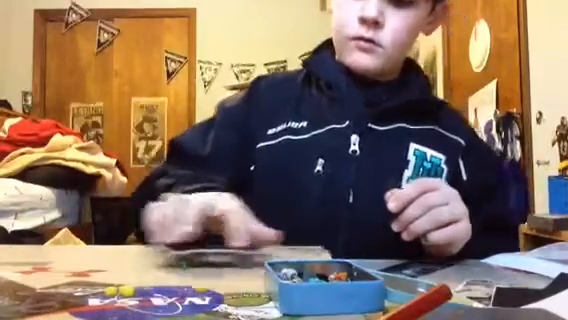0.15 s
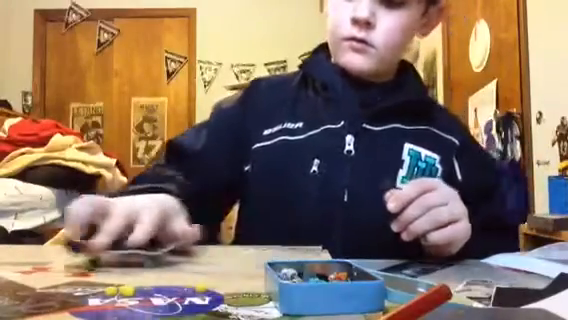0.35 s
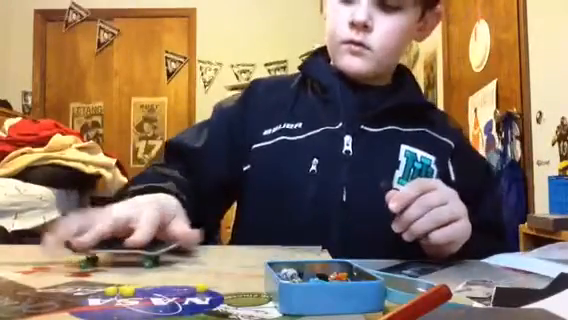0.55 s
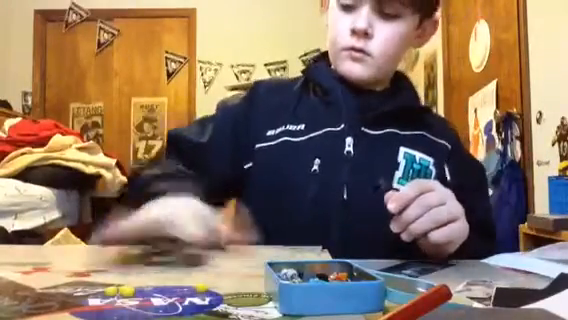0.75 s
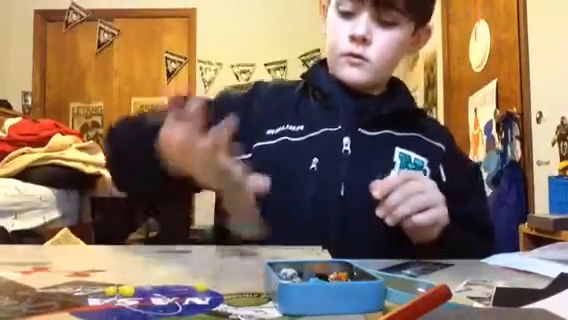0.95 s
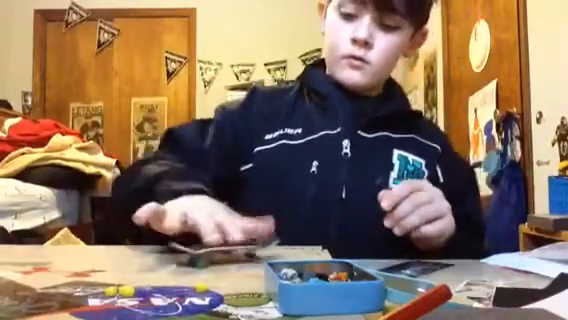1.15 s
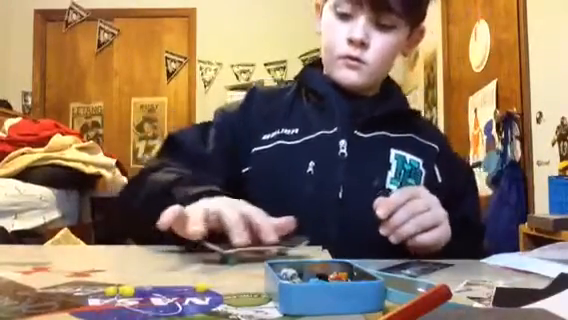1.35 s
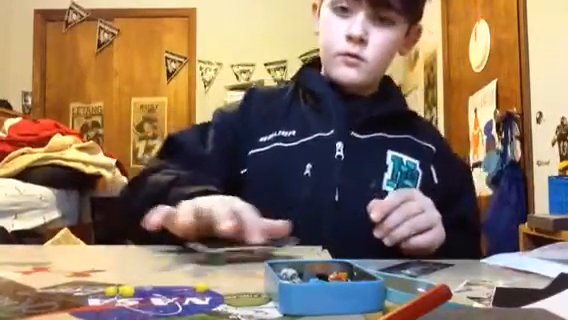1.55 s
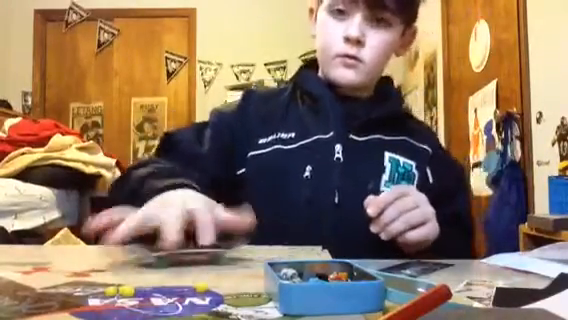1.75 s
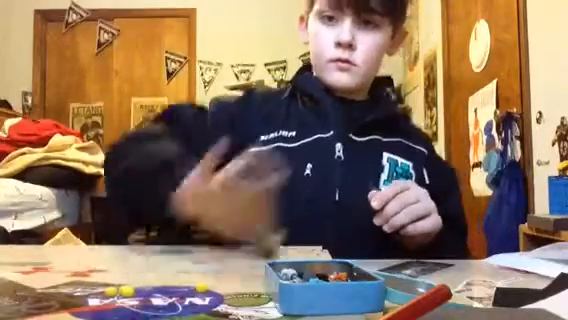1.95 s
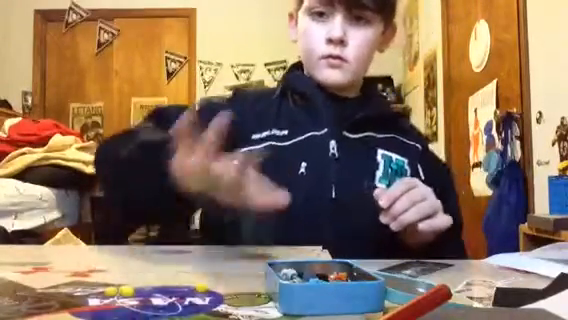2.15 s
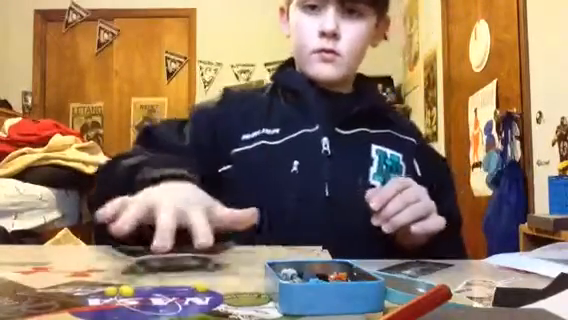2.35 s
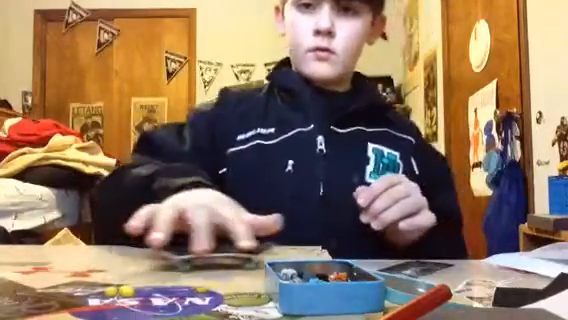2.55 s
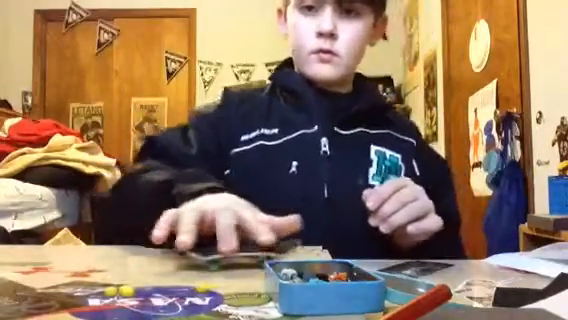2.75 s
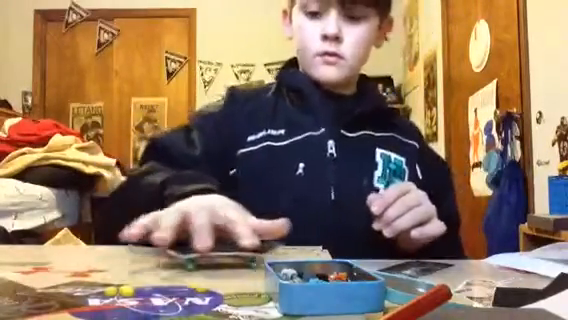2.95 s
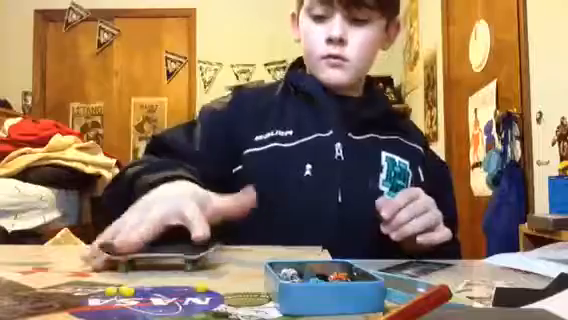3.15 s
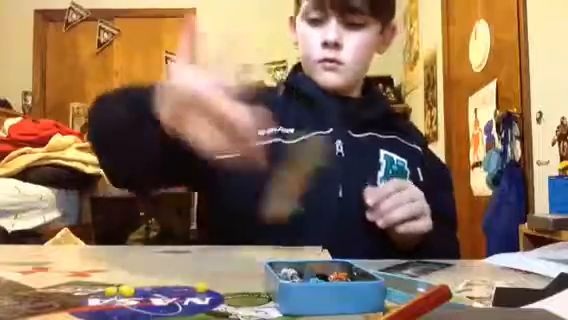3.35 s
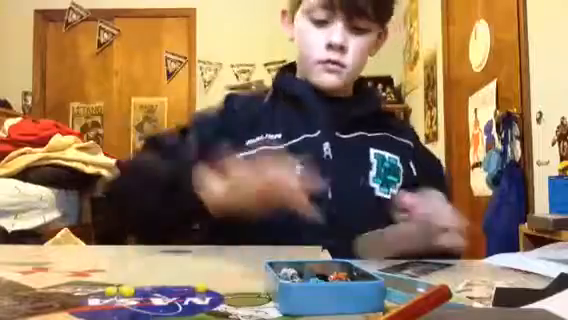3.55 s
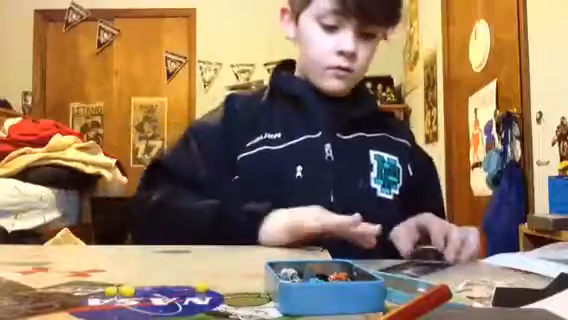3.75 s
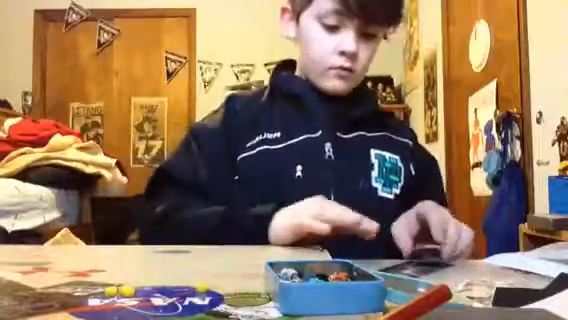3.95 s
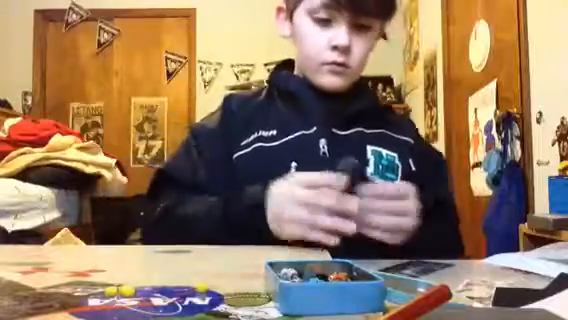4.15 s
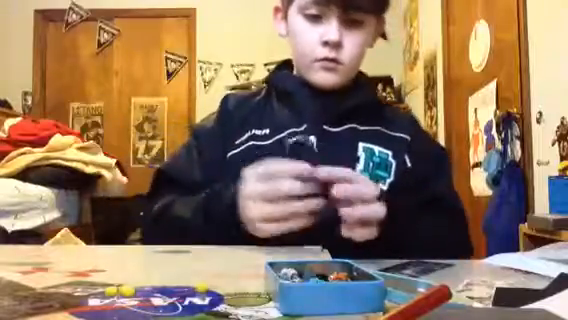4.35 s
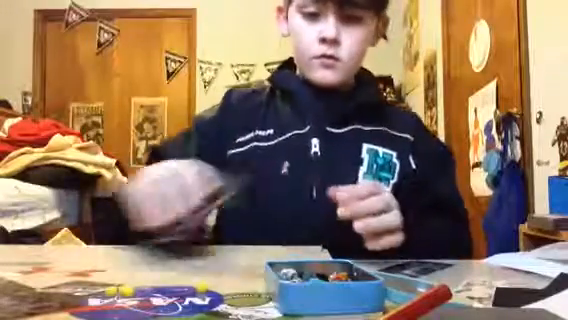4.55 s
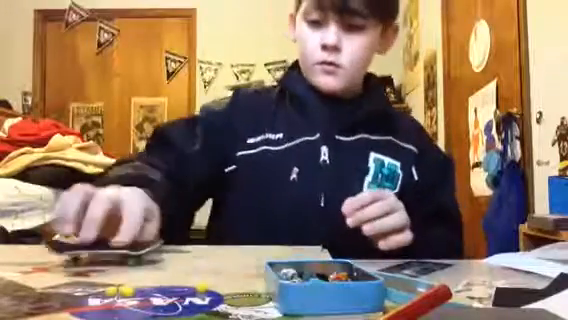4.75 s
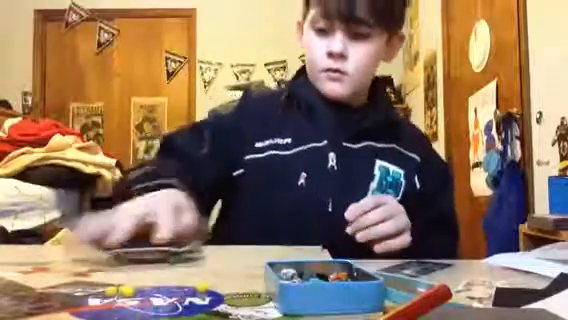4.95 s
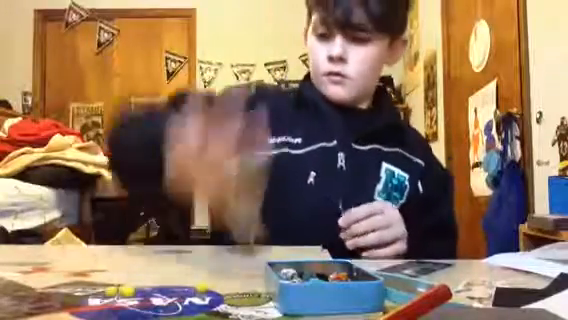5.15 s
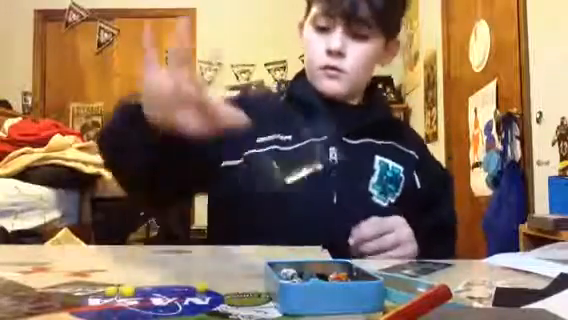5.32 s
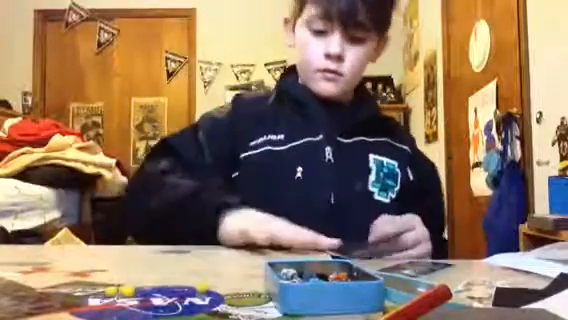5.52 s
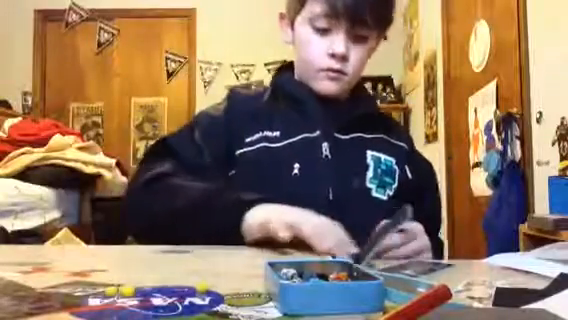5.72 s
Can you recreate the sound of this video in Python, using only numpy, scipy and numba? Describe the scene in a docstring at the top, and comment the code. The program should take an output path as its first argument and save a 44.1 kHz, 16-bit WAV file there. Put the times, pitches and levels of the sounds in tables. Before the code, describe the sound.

Close, dry wheel rumble and scraping on a table, broken by bright snaps and hard clacking landings of a toy skateboard indoors.

```python
"""In a small bedroom, close to the microphone, a fingerboard is ridden on a tabletop.
Its wheels roll over random bumps, which filters and moving resonances turn into rumble, grit and hiss.
The tail pops, and deck and trucks clatter down in quick bounces: noise bursts, damped modes and low thuds.
Skids growl, loose trucks rattle, and the board rustles as it is picked up and turned in the fingers.
Diffuse echoes and faint background noise surround it; the loudest clacks overload the recorder."""
import sys
import numpy as np
from scipy import signal
from scipy.fft import rfft, irfft
from scipy.io import wavfile
from numba import njit

SR = 44100
rng = np.random.default_rng(int(sys.argv[2]) if len(sys.argv) > 2 else 0)


def waveform_to_disk(signal):
    """Save audio, clipped to [-1, 1], as 16-bit WAV at the path in sys.argv[1]."""
    frames = np.transpose(np.atleast_2d(signal))
    scaled = np.clip(frames, -1, 1) * 32767
    samples = np.round(scaled).astype(np.int16)
    wavfile.write(sys.argv[1], SR, samples)


N = 254892
TIME = np.arange(N) / SR
HIT_TIME = np.arange(SR // 4) / SR

# strokes of the hand that roll the board; pressure is grit over rumble, both before their overall trims:
# start_s, rise_s, hold_s, release_s, rumble_db, pressure_db
STROKES = [(0,.01,.14,0.037,-52.5,-0.5), (0.124,0.066,0.18,.19,-31.5,0.5),
           (.575,0.23,.045,0.096,-33.5,-3.5), (1.098,0.0063,0.044,.09,-30.5,-20.5),
           (1.161,.04,0.11,0.093,-43.5,-7), (1.346,.03,0.037,.115,-48.5,6), (1.574,0.043,0.2,0.079,-37.5,0),
           (1.922,0.021,0.06,0.053,-41.5,7), (2.281,0.018,.02,0.095,-28,-19),
           (2.40,.11,.18,0.12,-41.5,-8.5), (2.885,0.26,.065,0.04,-34.5,-3.5),
           (3.272,.02,0.033,0.09,-41.5,8), (4.70,.02,.11,0.038,-40,7), (4.80,.05,.085,0.035,-39,-7.5),
           (4.92,0.03,0.082,0.089,-35.5,-2), (4.974,0.16,0.041,0.029,-32,1)]
# spectra of wheel rumble, grit and hiss: frequency_hz, level_db
RUMBLE_SPECTRUM = [(60, -46.5), (130, -50.5), (300, -20), (500, -25.5), (680, -3), (880, -1), (1130, 4.5),
                   (1400, -1), (1900, -14), (3000, -19), (6000, -56.5), (15000, -66)]
GRIT_SPECTRUM = [(300, -49), (900, -10.5), (1400, 8), (1800, 9), (2150, 3), (2550, 8), (3200, 4),
                 (4500, -1.5), (5300, -14), (6000, -29), (15000, -66)]
HISS_SPECTRUM = [(2500, -31), (5000, 3.5), (6200, -3.5), (7800, 3.5), (10000, -10.5), (12000, -9),
                 (13500, -29.5), (15000, -16.5)]

# deck and trucks hit the table under the fingers; knock and crack are relative to the contact:
# start_s, level_db, pitch_hz, knock_db, crack_db
CLACKS = [(0.0421,-36.5,1730,-16.5,-25.5), (0.2075,-27,2300,-21,-13.5), (0.8037,-22,1640,-28,-12.5),
          (1.0703,-16,4500,-28,-6), (1.0983,-10,1390,-14,-3), (1.1321,-13.5,2820,-25,-8.5),
          (1.1487,-13,1430,-17,-4.5), (1.9368,-29,1563,-34,-11.5), (2.2545,-11,2620,-29,-9),
          (2.257,-16.5,2240,-19,-4.5), (2.284,-10,2730,-17,-4), (2.2926,-11.5,1393,-25,-6),
          (3.2702,-18,3730,-18.5,-8), (3.5692,-25,3800,-30,-2), (3.586,-30,3670,-33,1),
          (3.6209,-28,3600,-12.5,-3.5), (3.6412,-30.5,2710,-10,-15), (3.7451,-30.5,1800,-10.5,5),
          (4.215,-55.5,1180,-1.5,-20), (4.7129,-31,2010,-34,-8), (4.726,-25.5,2180,-43,-21),
          (4.7653,-25.5,2170,-46,-5.5), (4.833,-31,1390,-36,-7), (5.4804,-11,4450,-14.5,-6.5),
          (5.4968,-13.5,1326,-10.5,-21), (5.517,-23,2800,-4.5,3.5), (5.56,-10,2280,-28,-12.5),
          (5.5722,-18,2600,-19,-10), (5.5792,-11,3640,-19,-8.5), (5.7092,-33.5,2420,-12,-1),
          (5.77,-32,4860,-13,-7.5)]
# light ticks of the wheels and trucks: start_s, level_db, pitch_hz
TICKS = [(.305,-27.5,2690), (.36,-32.5,2500), (.592,-50.5,1120), (0.964,-51,2700), (1.3695,-41.5,2720),
         (1.793,-40.5,2400), (2.382,-35,888), (2.848,-49,1950), (2.925,-51,2610), (4.004,-55.5,2380),
         (4.245,-59,4280), (4.451,-52,2780)]
# free falls of the loose board after a missed catch, with brief contact: start_s, level_db, pitch_hz
DROPS = [(3.545, -11.5, 2023), (3.6893, -11, 2400)]
DROP_T60_S, DROP_KNOCK_DB, DROP_CRACK_DB, DROP_THUMP_DB = 0.016, -26.5, -15.5, -32.5
# nominal chatter decay at the reference pitch; lower parts chatter longer
CONTACT_T60_S, CONTACT_REF_HZ, CONTACT_SLOPE = .026, 2620, 0.41
# modes of the board on the tabletop, before each blow's weighting, detuning and decay scale:
# frequency_hz, level_db, t60_s
BOARD_MODES = [(647, -2, 0.074), (1000, -9, 0.086), (1142, -1, 0.06), (1395, -6, 0.093), (1776, -2, 0.045),
               (2562, 2.5, 0.035), (2800, 3.5, 0.025), (3180, -7, 0.019), (4240, -3.5, 0.081),
               (4260, -13, 0.0088), (4870, -3.5, 0.02), (5073, -4, 0.059), (7540, -19, 0.0062)]
# spectra of contact chatter, table knock, hard crack and low table thud: frequency_hz, level_db
CHATTER_SPECTRUM = [(200, -36), (700, -25.5), (1100, 0.5), (1400, 9.5), (2100, 0), (2700, 8), (4600, 2),
                    (6000, -12), (10000, -17), (15000, -27)]
KNOCK_SPECTRUM = [(25, -34), (70, -34), (150, -6), (260, -8), (370, 6.5), (500, 1.5), (700, 2.5), (950, 9),
                  (1500, -12), (4000, -51)]
CRACK_SPECTRUM = [(1500, -25), (3500, -4), (5000, -1.5), (6200, -3.5), (7700, -2.5), (9500, -12.5),
                  (12000, -13), (15000, -25)]
THUD_SPECTRUM = [(40, -50), (85, -29.5), (115, -3.5), (140, -4.5), (200, 0), (280, -2), (370, 0),
                 (480, -8.5), (1200, -31)]

# sideways skids of a wheel, with the pitch at their start: start_s, rise_s, hold_s, release_s, level_db, pitch_hz
SKIDS = [(0.713,0.017,0.025,.03,-38,1020), (4.938,0.036,.015,0.05,-29,1237)]
SKID_FALL_OCTAVES_PER_S, SKID_WIDTH_HZ = 4.3, 220

# snaps of the tail against the table, the thump before its overall trim: start_s, deck_db, snap_db, thump_db
POPS = [(.843, -22.5, -22, -37), (1.982, -22, -16.5, -44.5), (3.3196, -21.5, -20, -36.5),
        (5.1855, -20, -15.5, -43)]
# spectrum of the tail tip's snap: frequency_hz, level_db
SNAP_SPECTRUM = [(500, -21), (1500, -6.5), (2500, -4.5), (4200, 1.5), (6000, -3), (7500, 2.5), (9200, -6.5),
                 (12000, -13.5), (15000, -18.5)]
POP_DECK_HZ, POP_SNAP_T60_S, POP_LEAD_S = 1510, .012, .001

# fingers and sleeve rub on the board, before the overall trim: start_s, rise_s, hold_s, release_s, level_db
RUBS = [(3.826,.03,0.026,0.086,-65), (3.39,0.032,0.11,.03,-56), (4.194,0.043,0.32,0.048,-61),
        (4.596,0.014,0.09,0.027,-45.5)]
# spectrum of the rustle: frequency_hz, level_db
RUB_SPECTRUM = [(59, -46), (100, -43), (227, -10.5), (399, -15.5), (582, -0.5), (1590, 8.5), (2320, -4),
                (4640, 1), (6760, -19.5), (8880, -13.5), (15000, -37)]
# rattles of loose trucks after a missed landing: start_s, hold_s, level_db
RATTLES = [(3.553,0.09,-45), (3.696,0.09,-41), (5.58,0.018,-37)]

# bands of the room's echoes: frequency_hz, echo_db, t60_s
ROOM_BANDS = [(150, -3, 0.32), (406, -6.5, 0.16), (1020, -13, 0.32), (2200, -15, 0.29), (4500, -12.5, 0.32),
              (8700, -9, 0.2), (13750, -6.5, 0.2)]
# spectrum of the faint background noise: frequency_hz, level_db
AIR_SPECTRUM = [(50, -44), (150, -7.5), (600, -6), (1200, -3), (2200, -10.5), (2680, 1.5), (3200, -10),
                (5200, -15.5), (6200, -22), (15000, -24.5)]
AIR_DB = -65.5  # level about which the noise wanders
TOP_HZ = 15400  # upper limit of the recorder


def undb(db):
    """Logarithmic level: decibels become an amplitude gain."""
    return 10 ** (np.asarray(db) / 20)


def unit(x):
    """Mean power: scale to rms 1."""
    return x / np.sqrt(np.mean(x ** 2))


def unit_attack(x):
    """Attack power: scale to rms 1 over the first 5 ms."""
    return x / np.sqrt(np.mean(x[:SR // 200] ** 2))


def colour(x, points):
    """Minimum-phase filtering: a folded cepstrum makes a causal filter through (Hz, dB) points."""
    size = 4096
    hz, db = np.transpose(points)
    grid = np.maximum(np.fft.rfftfreq(size, 1 / SR), 1)
    log_gain = np.log(undb(np.interp(np.log(grid), np.log(hz), db)))
    cepstrum = irfft(log_gain)
    cepstrum[1:size // 2] *= 2
    cepstrum[size // 2 + 1:] = 0
    impulse = irfft(np.exp(rfft(cepstrum)))[:size // 2]
    return signal.fftconvolve(x, impulse)[:len(x)]


@njit
def resonate(x, hz, width):
    """Time-varying resonance: a band-pass of given width in Hz whose centre may move every sample."""
    y, band, low = np.empty(len(x)), 0., 0.
    for i in range(len(x)):
        g, k = np.tan(np.pi * hz[i] / SR), width / hz[i]
        v = (band + g * (x[i] - low)) / (1 + g * (g + k))
        band, low, y[i] = 2 * v - band, low + 2 * g * v, k * v
    return y


def fade(t, t60):
    """Exponential damping: 60 dB down after t60."""
    return np.exp(-np.log(1000) * t / max(t60, 1 / SR))


def add(track, start, sound):
    """Superposition: mix a sound into the track at a time."""
    i = int(np.clip(start * SR, 0, N - 1))
    track[i:i + len(sound)] += sound[:N - i]


def walk(rate):
    """Random modulation: a bounded wander through `rate` points per second, with a spread near 1."""
    steps = 2 * np.tanh(rng.standard_normal(4096))
    return np.interp(TIME * rate, np.arange(len(steps)), steps)


def grains(rate, spread_db):
    """Shot noise: random tiny impacts of unequal size, `rate` per second on average."""
    size = undb(spread_db * np.minimum(rng.exponential(size=N), 3))
    return (rng.random(N) < rate / SR) * rng.choice([-1, 1], N) * size


def gesture(start, rise, hold, release):
    """Trapezoidal envelope: a movement of the hand, 0-1, builds evenly, holds and lets go."""
    opening = (TIME - start) / rise
    closing = (start + rise + hold + release - TIME) / release
    return np.clip(np.minimum(opening, closing), 0, 1)


def rolling(speed_power=1.024, grit_power=1.77):
    """Power laws of rolling: rumble and grit, in dB, both grow with speed, the grit faster."""
    rumble = grit = np.full(N, undb(-110))  # floor keeps the logarithm finite
    for start, rise, hold, release, db, pressure_db in STROKES:
        speed = gesture(start, rise, hold, release)
        rumble = np.hypot(rumble, undb(db) * speed ** speed_power)
        grit = np.hypot(grit, undb(db + pressure_db) * speed ** grit_power)
    return 20 * np.log10(rumble), 20 * np.log10(grit)


def wheels(rumble_db=-3, grit_db=-2, hiss_db=-16.0, hiss_growth=0.31, sing_db=0, scrape_db=-6,
           low_grit_db=-1, high_grit_db=-6, note_hz=1200, note_octaves_per_db=0.36):
    """Roughness excitation: clumps of tiny bumps ring board and table; wheels pressed hard grind and hiss."""
    def bumps():
        """Clustered shot noise: the tiny impacts vary in strength along the grain."""
        return grains(rate=2000, spread_db=3) * undb(1.8 * walk(70))

    judder = undb(2.5 * walk(90))
    level, rough = rolling()

    # the resonances shift as the wheels travel; firmer fingers raise the tabletop's main note
    note = note_hz * 2 ** (note_octaves_per_db * (rough - level))
    sing = unit(resonate(bumps(), note * np.exp(0.055 * walk(25)), 53.0))
    scrape = unit(resonate(bumps(), 1700 * np.exp(0.21 * walk(22)), 61.0))
    rumble = unit(unit(colour(bumps(), RUMBLE_SPECTRUM)) + undb(sing_db) * sing)

    # front and rear wheels meet different bumps
    front, rear = bumps() * judder, bumps() * judder
    squeeze_hz = 3100 * np.exp(0.35 * walk(30))
    squeeze = unit(resonate(colour(rear, GRIT_SPECTRUM), squeeze_hz, 320.0))
    grit = undb(low_grit_db) * unit(colour(front, GRIT_SPECTRUM))
    grit += undb(high_grit_db) * squeeze
    grit += undb(scrape_db) * scrape * judder
    grit = unit(grit)

    # hiss gains on the grit as the grit nears its peak level
    pressure_db = rough - rough.max()
    hiss = undb(hiss_db + hiss_growth * pressure_db) * unit(colour(front + rear, HISS_SPECTRUM))
    return undb(level + rumble_db) * rumble + undb(rough + grit_db) * (grit + hiss)


def burst(t60, press_share=0.15):
    """Broadband impact: micro-contacts with a nearly even spectrum hold under pressure, then fade."""
    press_s = press_share * t60
    envelope = fade(np.hypot(HIT_TIME, press_s) - press_s, t60)
    x = rng.standard_normal(len(envelope)) * envelope
    # keeping only the phases evens the spectrum
    even = irfft(np.exp(1j * np.angle(rfft(x))), len(x))
    return even * np.sqrt(envelope)


def ring(modes, scatter=0.036):
    """Modal superposition: damped sines, detuned a little at each blow by the grip of the fingers."""
    out = np.zeros(len(HIT_TIME))
    for (hz, db, t60), (u, phase) in zip(modes, rng.random((len(modes), 2))):
        detuned_hz = hz * (1 + scatter * (2 * u - 1))
        out += undb(db) * fade(HIT_TIME, t60) * np.sin(2 * np.pi * (detuned_hz * HIT_TIME + phase))
    return out


def contact(centre_hz, t60, focus_db=2.5, ring_db=-4.5, ring_scale=.75, part_db=-3.0, part_cycles=19):
    """Impact response: brief chatter, board modes around the striking part's pitch, and the part's own ring."""
    def stress(hz):
        """Spectral focus: the level falls with distance in octaves from the struck pitch."""
        octaves = np.log2(hz / centre_hz)
        return -focus_db * octaves ** 2 / np.hypot(1, octaves)

    chatter_points = [(hz, db + stress(hz)) for hz, db in CHATTER_SPECTRUM]
    chatter = colour(burst(t60, press_share=0.13), chatter_points)
    swell = 1 - fade(HIT_TIME, 0.015)
    struck = [(hz, db + 2 * stress(hz), ring_scale * decay) for hz, db, decay in BOARD_MODES]
    modes = swell * ring(struck, scatter=0.025)
    # the part dies within a set number of cycles, so high ones are short and broad
    part = swell * ring([(centre_hz, 0, part_cycles / centre_hz)])
    hit = unit_attack(chatter) + undb(ring_db) * unit_attack(modes) + undb(part_db) * unit_attack(part)
    return unit_attack(hit)


def contact_t60(hz):
    """Frequency-dependent damping: nominal chatter time of a part of this pitch on the table."""
    return CONTACT_T60_S * (CONTACT_REF_HZ / hz) ** CONTACT_SLOPE


def blow(centre_hz, t60, knock_db, crack_db, knock_t60=0.038, crack_share=1.0, focus_db=2.0, soft_focus=0.25):
    """Coupled impact: a blow rings the board, knocks the tabletop and cracks at the hard point of contact."""
    # a softer blow has less crack and excites a narrower band
    hit = contact(centre_hz, t60, focus_db - soft_focus * crack_db)
    hit += undb(knock_db) * unit_attack(colour(burst(knock_t60), KNOCK_SPECTRUM))
    return hit + undb(crack_db) * unit_attack(colour(burst(t60 * crack_share), CRACK_SPECTRUM))


def clacks(level_db=0, tick_t60=.028):
    """Repeated impact: knocks under the fingers, free drops and light ticks each excite the board."""
    out = np.zeros(N)
    for start, db, centre_hz, knock, crack in CLACKS:
        add(out, start, undb(db + level_db) * blow(centre_hz, contact_t60(centre_hz), knock, crack))
    for start, db, centre_hz in DROPS:
        add(out, start, undb(db) * blow(centre_hz, DROP_T60_S, DROP_KNOCK_DB, DROP_CRACK_DB))
    for start, db, centre_hz in TICKS:
        add(out, start, undb(db) * contact(centre_hz, tick_t60))
    return out


def thumps(t60=0.11, level_db=-3.5, landing_db=-20, lag_s=0.00091):
    """Dense low modes: the table thuds under the hand at each pop, and at each landing or drop."""
    out = np.zeros(N)
    swell = 1 - fade(HIT_TIME, .015)
    pushes = [(start, db) for start, _, _, db in POPS]
    # a landing's thud goes in step with its knock
    pushes += [(start, db + knock + landing_db) for start, db, _, knock, _ in CLACKS]
    pushes += [(start, db + DROP_THUMP_DB) for start, db, _ in DROPS]
    for start, db in pushes:
        thud = colour(burst(t60, press_share=0) * swell, THUD_SPECTRUM)
        thud /= np.std(thud[:SR // 25])  # spread over the first 40 ms
        add(out, start + lag_s, undb(db + level_db) * thud)
    return out


def skids():
    """Friction-driven resonance: a skidding wheel drives one note of the top, which sinks as the wheel slows."""
    out = np.zeros(N)
    width = 1. * SKID_WIDTH_HZ
    for start, rise, hold, release, db, hz in SKIDS:
        elapsed = np.clip(TIME - start, 0, rise + hold + release)
        pitch = hz * 2 ** (-SKID_FALL_OCTAVES_PER_S * elapsed)
        slips = grains(rate=2000, spread_db=2)
        growl = resonate(resonate(slips, pitch, width), pitch, width)
        out += undb(db) * unit(growl) * gesture(start, rise, hold, release)
    return out


def pops(deck_t60=0.0087):
    """Successive impacts: the deck knocks on the table, and an instant later its tip snaps brightly."""
    out = np.zeros(N)
    for start, deck_db, snap_db, _ in POPS:
        deck = blow(POP_DECK_HZ, deck_t60, knock_db=-13, crack_db=-7.5)
        snap = unit_attack(colour(burst(POP_SNAP_T60_S), SNAP_SPECTRUM))
        add(out, start - POP_LEAD_S, undb(deck_db) * deck)
        add(out, start, undb(snap_db) * snap)
    return out


def handling(level_db=-2, flutter_db=4.0, rub_hz=2680, rub_db=-2.0, light_db=-62):
    """Sliding friction: dry, uneven rustle of a board turned over; the fingers rub a faint note from the deck."""
    rustle = unit(colour(grains(rate=2000, spread_db=2.2), RUB_SPECTRUM)) * undb(flutter_db * walk(35))
    slips = grains(rate=900, spread_db=3)
    note = unit(resonate(slips, np.full(N, 1. * rub_hz), 300.) * undb(4.5 * walk(22)))
    touch = sum(undb(db + level_db) * gesture(*timing) for *timing, db in RUBS)
    # the note stands out under a light touch; a firm grip is mostly rustle
    return rustle * touch + undb(rub_db) * note * np.minimum(touch, undb(light_db))


def tumble(knock_db=-8, crack_db=-7, rise_s=.01, release_s=0.067):
    """Random repeated impact: loose trucks and wheels rattle against the table after a missed landing."""
    taps = grains(rate=350, spread_db=2.5)
    rattle = unit(colour(taps, CHATTER_SPECTRUM))
    rattle += undb(knock_db) * unit(colour(taps, KNOCK_SPECTRUM))
    rattle += undb(crack_db) * unit(colour(taps, CRACK_SPECTRUM))
    return rattle * sum(undb(db) * gesture(start, rise_s, hold_s, release_s) for start, hold_s, db in RATTLES)


def room(x, build_t60=0.02, gap_s=0.0055):
    """Diffuse reverberation: bands of noise build after a short gap and decay, each at its own rate."""
    t = np.arange(SR // 2) / SR
    spectrum = rfft(rng.standard_normal(len(t)))
    log_hz = np.log(np.maximum(np.fft.rfftfreq(len(t), 1 / SR), 1))
    centres = np.log([row[0] for row in ROOM_BANDS])
    tail = np.zeros(len(t))
    # each pick singles out one band, cross-faded with its neighbours
    for pick, (_, db, t60) in zip(np.eye(len(ROOM_BANDS)), ROOM_BANDS):
        envelope = fade(t, t60) * (1 - fade(np.maximum(t - gap_s, 0), build_t60))
        band = irfft(spectrum * np.interp(log_hz, centres, pick), len(t))
        tail += undb(db) * band * envelope / np.linalg.norm(envelope)
    return x + signal.fftconvolve(x, tail)[:N]


def background():
    """Stationary noise, slowly modulated: a faint coloured noise whose level wanders."""
    return undb(AIR_DB + 2 * walk(2.7)) * unit(colour(rng.standard_normal(N), AIR_SPECTRUM))


def scene():
    """Superposition of sources: board, table and hands in the room, over faint background noise."""
    close = wheels() + clacks() + thumps() + skids() + pops() + handling() + tumble()
    return (room(close) + background())[None]


def record(dry, bass_hz=95):
    """Band limits and saturation: a small microphone loses deep bass; the recorder rounds peaks and cuts the top."""
    thin = signal.sosfilt(signal.butter(3, bass_hz, "highpass", fs=SR, output="sos"), dry)
    rounded = thin / (1 + thin ** 4) ** (1 / 4)
    return signal.sosfilt(signal.ellip(8, .2, 70, TOP_HZ, fs=SR, output="sos"), rounded)


dry = scene()
out = record(dry)
waveform_to_disk(out)
```